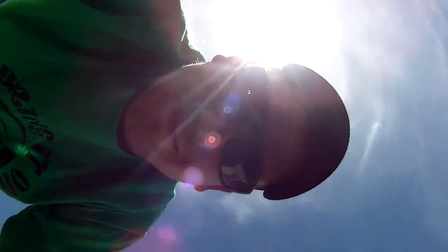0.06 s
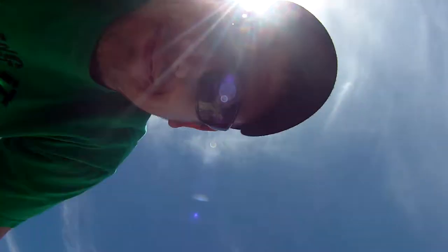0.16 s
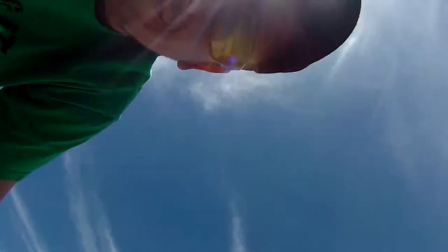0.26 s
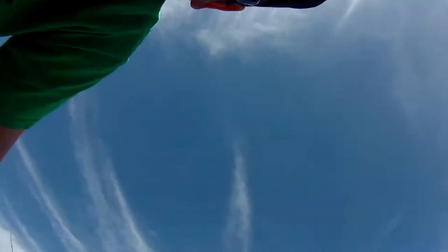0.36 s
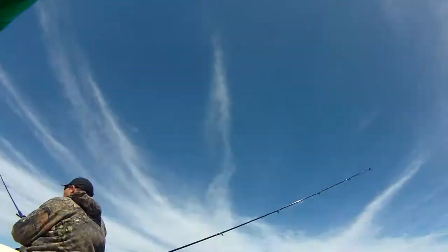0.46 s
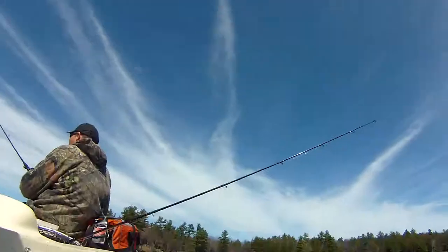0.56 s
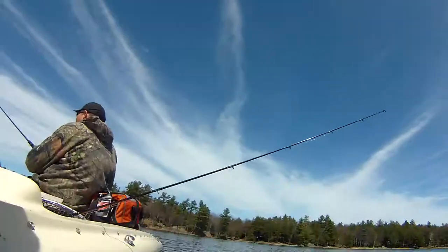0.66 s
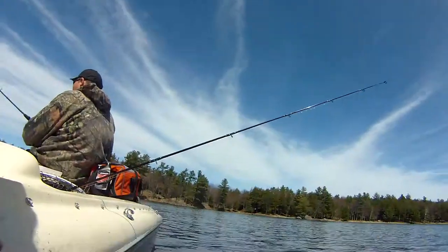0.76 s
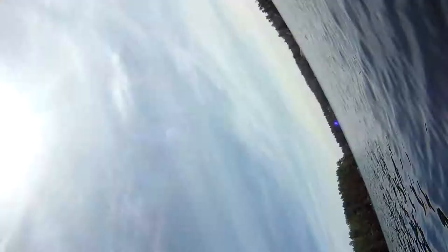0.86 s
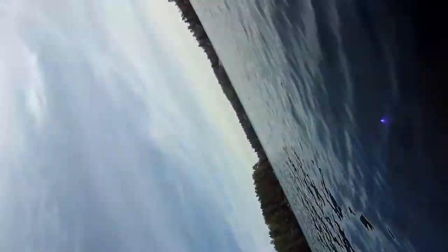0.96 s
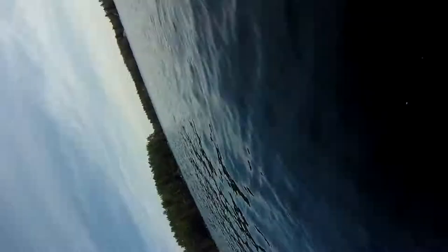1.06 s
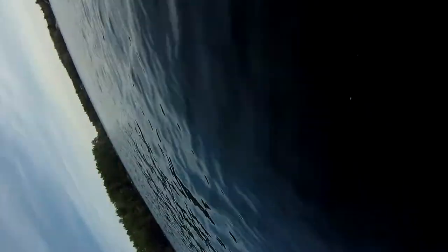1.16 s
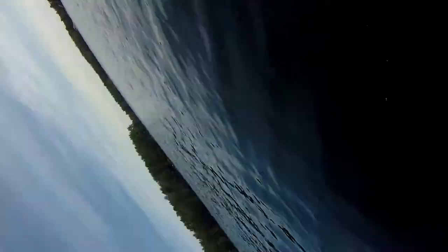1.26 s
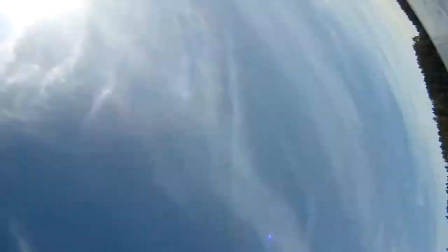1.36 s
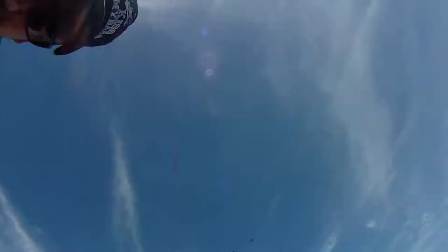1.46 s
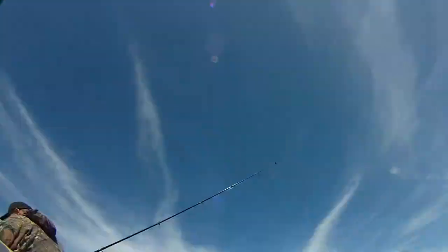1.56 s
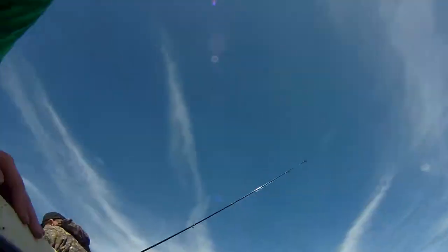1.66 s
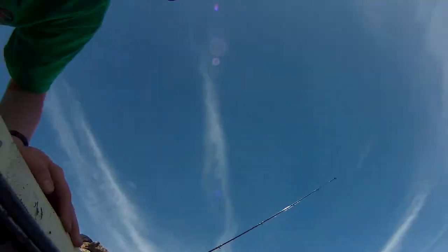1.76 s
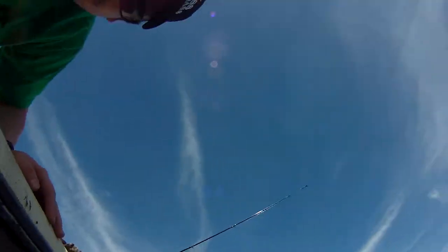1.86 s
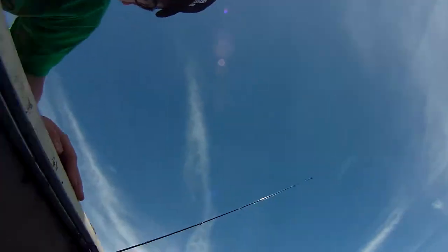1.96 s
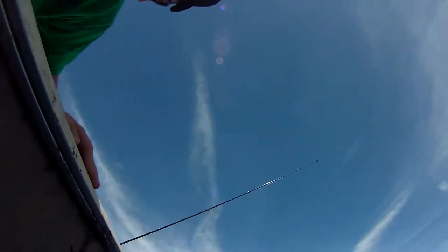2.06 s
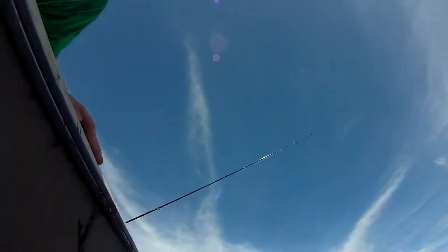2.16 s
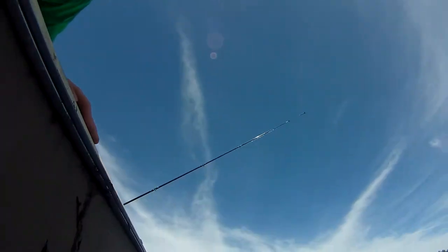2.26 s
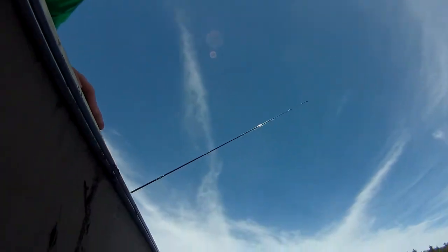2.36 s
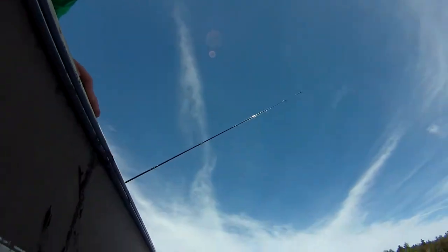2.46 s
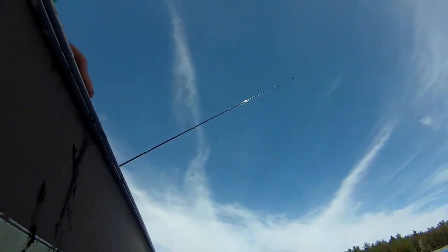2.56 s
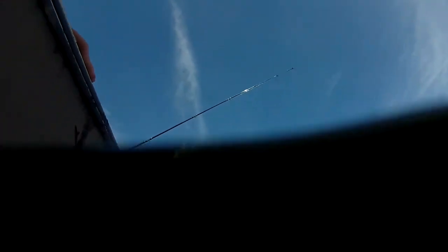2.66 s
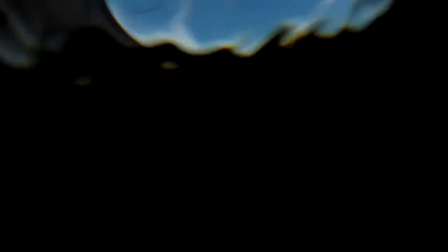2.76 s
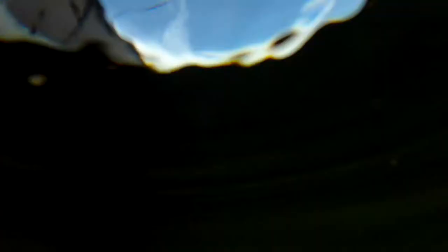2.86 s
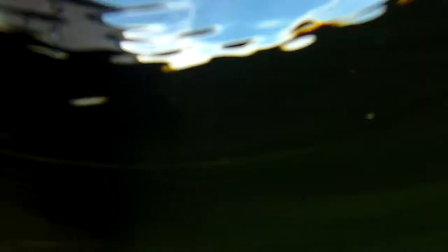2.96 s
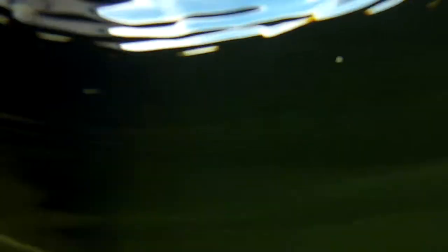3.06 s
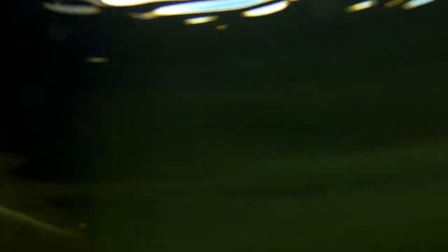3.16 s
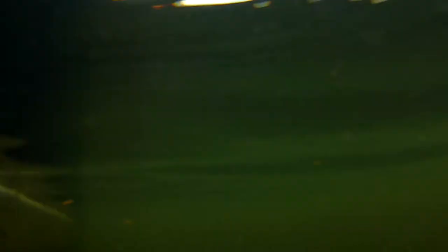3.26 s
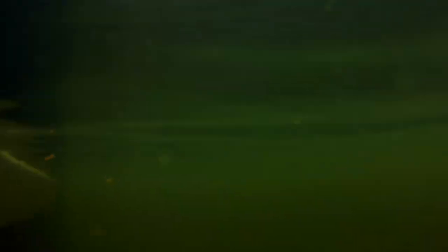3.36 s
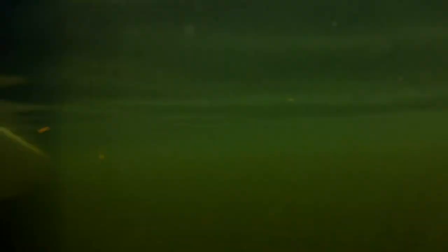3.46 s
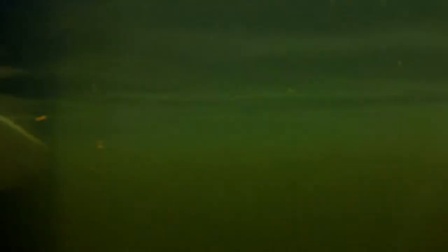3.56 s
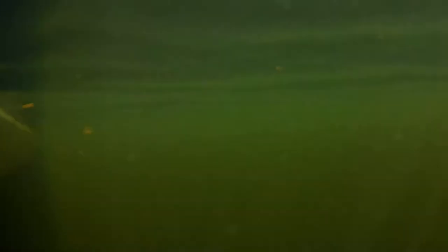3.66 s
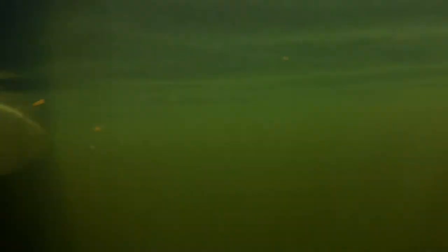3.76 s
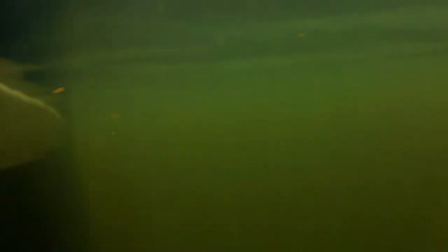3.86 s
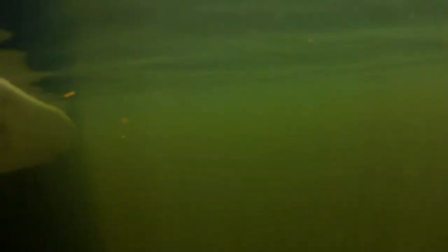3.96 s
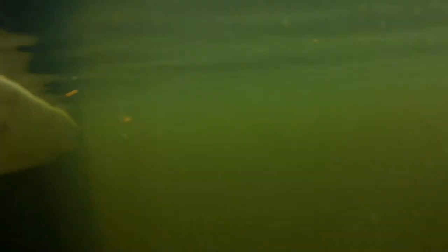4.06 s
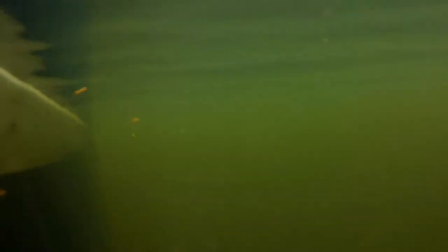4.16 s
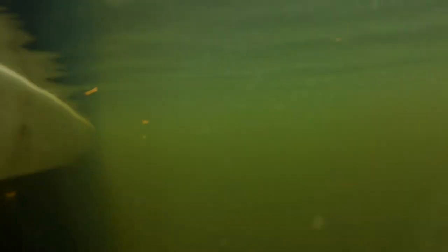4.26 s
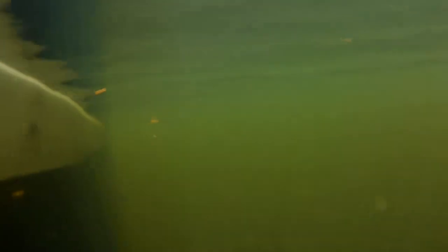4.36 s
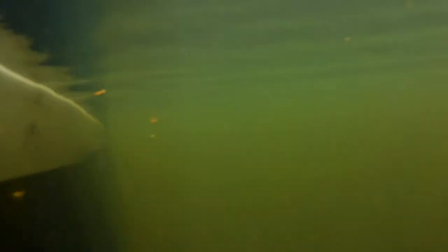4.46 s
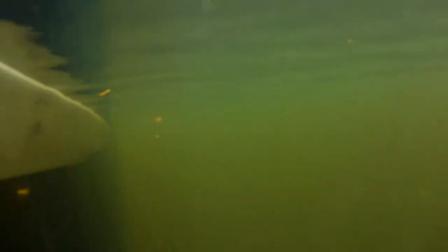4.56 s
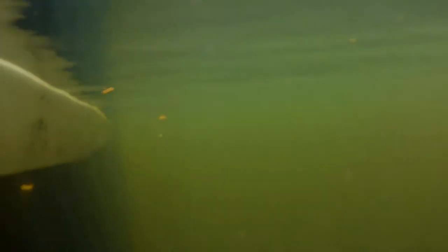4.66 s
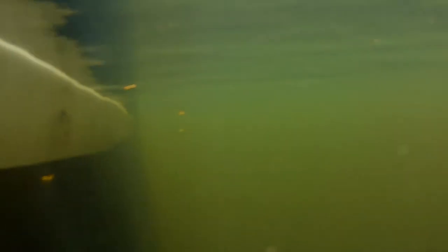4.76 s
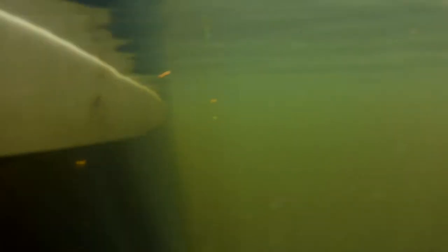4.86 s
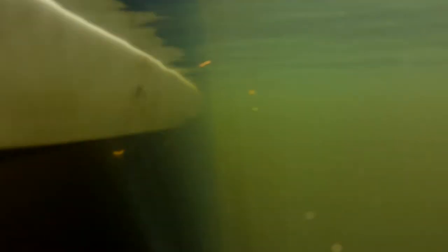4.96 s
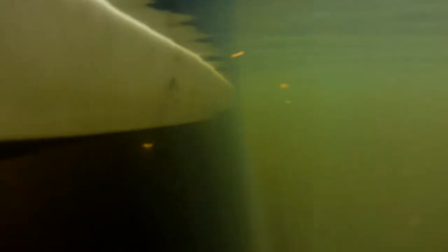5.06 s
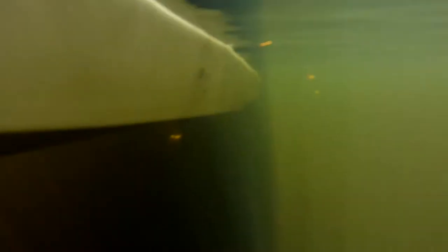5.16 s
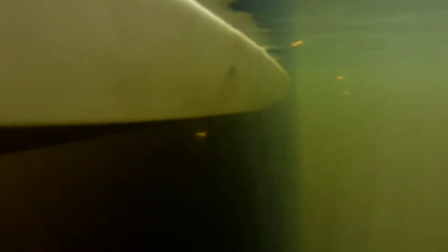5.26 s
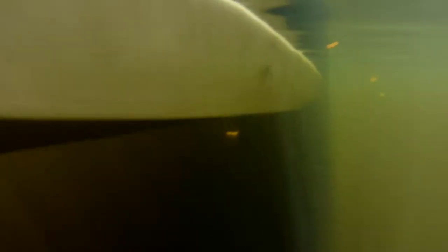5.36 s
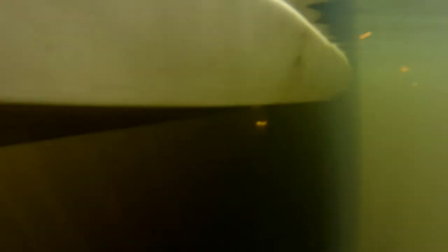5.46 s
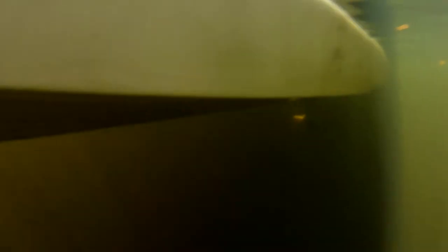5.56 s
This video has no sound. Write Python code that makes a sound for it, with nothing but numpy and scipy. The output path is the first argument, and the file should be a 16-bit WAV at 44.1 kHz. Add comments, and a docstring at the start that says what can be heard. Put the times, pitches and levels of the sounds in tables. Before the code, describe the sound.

A small sealed camera is handled beside a boat, then dunked: dry scrapes give way to heavy bumps, deep watery rumbling and clicks.

```python
"""A small sealed camera is carried to the side of a boat and dipped under water, heard from inside its case.
In air, filtered noise and a wavering sine make wash and hum; bursts of juddering noise are fingers on the case.
Knocks are pressure pulses with clicks, and plops are gliding sines with splashes. At 2.7 s the case goes under:
crackles cluster there, then evened low noise rumbles past and shaped noise swishes by. The recorder ducks at
hard knocks, and holds each slow sample, which mirrors the sound into the treble."""
import sys
import numpy as np
from scipy import signal
from scipy.fft import rfft, irfft
from scipy.io import wavfile
from scipy.ndimage import uniform_filter1d, minimum_filter1d

SR = 44100
rng = np.random.default_rng(int(sys.argv[2]) if len(sys.argv) > 2 else 0)


def digitize_waveform(pressure):
    """Quantize a signal to 16-bit integers and store it at the path in sys.argv[1].

    Rows of a 2-D input are taken as channels; values are limited to [-1, 1].
    """
    field = np.atleast_2d(pressure).T
    bounded = np.clip(field, -1, 1)
    quanta = np.round(bounded * 32767).astype(np.int16)
    wavfile.write(sys.argv[1], SR, quanta)


N = 247842
TIME = np.arange(N) / SR  # s
UNDER_S = 2.73  # the moment the case goes under

# muffled open-air wash: (frequency [Hz], relative level [dB per Hz])
AIR_SPECTRUM = [(20, -7), (45, -7.5), (90, -9), (132, -5.5), (190, -11.5), (350, -16), (600, -22.5),
                (900, -23), (1500, -29), (2200, -30), (2900, -36.5), (5800, -55.5)]
AIR_START_DB, AIR_RISE_DB_PER_S = -46, 1.0  # grows as the camera nears the water
# low hum, perhaps a motor on the boat, ahead of a 4.5 dB lift: (time [s], level [dB])
HUM_LEVEL = [(0.0, -50), (0.57, -54), (0.99, -46), (1.13, -51), (1.32, -42.5), (1.64, -49), (2.6, -44)]
HUM_HZ = 69.2

# fingers slide on the dry case, ahead of a 0.85 dB lift:
# (start [s], end [s], mid-stroke level [dB], swell from start to end [dB])
RUB_STROKES = [(0.209, 0.273, -42, 8), (0.28, 0.449, -36.5, -16), (0.459, 0.52, -41.5, 12),
               (0.626, 0.697, -35, -4), (0.683, 0.817, -53, -3), (0.809, 0.855, -40.5, 11),
               (0.913, 1.106, -55, 9), (1.069, 1.294, -39, 7), (1.37, 1.417, -41.5, -10),
               (1.42, 1.5, -47, 8), (1.492, 1.605, -35, -8.5), (1.632, 1.768, -39.5, 10.5),
               (1.788, 1.951, -39.5, 17), (1.989, 2.125, -41.5, -4), (2.226, 2.267, -52.5, 0),
               (2.389, 2.424, -44, -5), (2.56, 2.71, -56, 23)]
# tone of skin on the case: (frequency [Hz], relative level [dB])
RUB_SPECTRUM = [(300, -5), (900, -13), (1400, -7.5), (2100, -4.5), (2900, -9.5), (3800, -5.5), (4400, 0),
                (4950, 5.5), (5400, 5.5), (5900, -4.5)]
RUB_ATTACK_S, RUB_RELEASE_S, RESTING_DB = 0.02, 0.032, -64  # fingers at rest barely hiss
RUB_ARCH_DB, RUB_WAVER_DB = 3, 2  # pressure is greatest in mid-stroke, and never quite steady
# a finger catches on the dry case, ahead of a 3 dB lift: (time [s], level [dB])
FINGER_CATCHES = [(0.057, -25.5), (0.2835, -16.5), (0.642, -13), (2.476, -20.5), (2.644, -23), (2.687, -19),
                  (2.706, -21)]

# water and hand knock the case; the click is set ahead of an 8 dB cut:
# (time [s], push [dB], rise [s], hold [s], suction beforehand [share of push], click [dB])
CASE_KNOCKS = [ (0.065, -25.5, 0.0039, 0.013, 0.075, -70), (1.749, -23, 0.0032, 0.0098, 0.46, -70),
               (2.6627, -1.5, 0.0014, 0.0004, 0, -17.5), (2.7334, 6.5, 0.00011, 0.00091, 0.67, -19),
               (2.7864, -9.5, 0.00078, 0.0026, 0.76, -17), (2.798, -1.5, 0.0011, 0.0046, 0, -19),
               (2.8747, -9, 0.00059, .0033, 0.23, -31), (2.8937, -2.5, 0.00083, 0.0037, 0, -42),
               (2.9146, -14.5, 0.00052, 0.0054, 0.42, -23), (2.987, -12.5, 0.00081, 0.0098, 0.35, -53),
               (3.1512, 6, .0012, .0037, 0.22, 1.5), (3.329, 9.5, 0.00049, 0.0052, 0.05, 10),
               (3.555, 7, 0.00045, 0.00506, 0.056, 5.5), (3.998, -5.5, 0.00083, 0.0036, 0.48, -5.5),
               (4.422, 12, 0.0004, 0.0039, 0.045, 14.5), (4.974, -8.5, 0.0019, 0.0068, 1, -34),
               (5.054, -5, 0.00065, .0044, 0, -8.5), (5.291, -3.5, 0.0036, 0.0036, 0, -50)]
# modes of the case, ahead of their swell: (multiple of the click pitch, relative level [dB], t60 [s])
CASE_MODES = [(.78, 13.5, 0.00076), (1, 7, 0.0016), (1.25, -69, 0.0017)]
# a slower knock draws the water back earlier; the width is a share of that lead
SUCTION_S, SUCTION_PER_RISE, SUCTION_WIDTH = 0.00057, 4.96, 0.8
CLICK_SURFACE_HZ, CLICK_DEEP_HZ, SINK_S = 1120, 1933, 0.16  # the click rises in pitch as the case sinks

# air pockets ring as water laps the hull:
# (time [s], level [dB], pitch [Hz], t60 [s], splash re the ring's reference level [dB])
HULL_PLOPS = [ (0.775, -27.5, 1464, 0.02, -4.5), (0.777, -32, 1890, 0.028, -10),
              (1.037, -34.5, 750, 0.033, -5), (1.040, -35, 122, 0.14, -2), (1.042, -29, 338, 0.093, 0.5),
              (1.655, -40, 607, 0.058, 3.5), (2.101, -27, 930, 0.041, -4), (2.409, -45, 1024, 0.11, 3.5),
              (2.565, -21.5, 703, 0.035, -12), (2.7318, -9.5, 315, 0.02, -1.5),
              (2.783, -18.5, 1110, 0.015, -8), (2.798, -24.5, 1224, 0.025, -15),
              (2.825, -32.5, 656, 0.024, 1), (2.986, -29.5, 2100, 0.015, -20),
              (3.011, -25.5, 142, 0.088, -17), (3.7938, -18, 472, 0.032, -5), (4.202, -28, 323, 0.075, 3.5),
              (4.371, -29.5, 263, .056, -7), (4.396, -28, 698, 0.028, 4), (4.398, -20.5, 1325, 0.026, -3),
              (4.717, -34, 432, 0.11, 0.5), (4.858, -12, 498, 0.059, -8.5), (5.430, -37.5, 629, 0.066, -12),
              (5.435, -34.5, 1295, 0.042, 0.5), (5.4346, -29, 1880, 0.02, -3)]
# modes of an air pocket: (multiple of the pitch, level [dB])
POCKET_MODES = [(1.002, 2.5), (1.158, -5.5), (1.85, -12), (2.4, -16)]
POCKET_DAMPING = 0.59  # ring time falls with the mode's multiple to this power
# tone of a plop's splash: (multiple of the pitch, relative level [dB])
SPLASH_SPECTRUM = [(.2, 9), (.6, -1), (.9, 2), (1.3, 3.5), (2.2, -39), (4, -32), (10, -37.5)]

# short crackles of water and trapped air on the case, ahead of a 3 dB lift: (time [s], level [dB])
CASE_CRACKLES = [(2.566, -21), (2.706, -19.5), (2.717, -24.5), (2.725, -22), (2.741, -35), (2.7685, -26),
                 (2.7815, -19), (2.7975, -16), (2.8725, -25.5), (2.896, -29.5), (2.916, -24), (2.956, -31),
                 (3.5075, -21), (3.824, -24.5), (4.154, -30), (4.236, -28), (4.315, -31), (4.966, -28.5),
                 (4.981, -29.5), (5.098, -35), (5.227, -36.5), (5.2895, -27)]
# tone of crackles, chatter and ticks: (frequency [Hz], relative level [dB per Hz])
CRACKLE_SPECTRUM = [(150, 19), (450, -10), (700, 12), (1100, 3.5), (1700, 3.5), (2200, -1.5), (2800, -4),
                    (4000, -4), (5800, -14.5)]

# strength of the current: the plunge, a lull, then the sweep along the hull: (time [s], level [dB])
CURRENT_LEVEL = [(2.66, -23), (2.82, -17.5), (3.0, -21.5), (3.07, -25), (3.22, -28.5), (3.3, -25),
                 (3.42, -29.5), (3.66, -27), (3.79, -15), (4.07, -19), (4.4, -17), (4.65, -24.5),
                 (4.95, -20), (5.1, -24), (5.26, -16), (5.45, -21.5), (5.62, -24)]
# rumble of the eddies: (frequency [Hz], relative level [dB])
EDDY_SPECTRUM = [(10, -12), (20, 1), (30, 6), (43, -0.5), (60, -9.5), (85, -18), (130, -27.5), (220, -38.5),
                 (500, -52), (1200, -68), (3000, -103), (5600, -79)]
EDDY_SWELL_DB = 0  # slow unevenness of the eddies; 0 is steady
# fizz of the open water: (frequency [Hz], relative level [dB])
FIZZ_SPECTRUM = [(60, 1), (200, -1.5), (450, -4.5), (900, -10.5), (1600, -16.5), (2800, -20.5), (4200, -24),
                 (5800, -31.5)]
FIZZ_DB, FIZZ_FOLLOWS = -49, 0.28  # level at a 0 dB current; share of the current's dB swing it follows
SURFACE_FIZZ_DB, SURFACE_FIZZ_S = 2, 1  # extra fizz just under the surface; its fading time constant
TICKS_PER_S, TICKS_DB = 91, -59  # specks of air touching the case

# water swishes past the grip and the case: (peak [s], rise [s], fall [s], level [dB], upper edge [Hz])
WATER_SWISHES = [(3.14, 0.14, 0.026, -56.5, 3620), (3.301, 0.084, 0.04, -42.5, 3130),
                 (3.54, .11, 0.034, -35, 3190), (3.819, 0.075, 0.052, -40, 3300),
                 (3.95, 0.041, 0.072, -48, 3350), (4.05, 0.13, 0.063, -46.5, 2120),
                 (4.225, 0.078, 0.051, -42, 2230), (5.294, 0.016, 0.057, -49, 4340),
                 (5.314, 0.056, 0.07, -45.5, 2150)]
# tone of a swish ahead of its upper edge: (frequency [Hz], relative level [dB per Hz])
SWISH_SPECTRUM = [(150, 9), (480, -5), (700, -2), (1000, 8), (1250, 0.5), (1700, 7.5), (2200, 3), (2900, 4),
                  (4000, 5.5), (5800, 22.5)]

HELD_HZ, EDGE_HZ = 12000, 15600  # the recorder's slow sampling rate and its band limit


def gain_of(db):
    """Decibels to amplitude."""
    return 10 ** (np.asarray(db) / 20)


def evened(x):
    """Scales to rms 1."""
    return x / np.sqrt(np.mean(x ** 2) + 1e-20)


def level(curve):
    """Gain at every sample from rows (time [s], level [dB])."""
    return gain_of(np.interp(TIME, *np.transpose(curve)))


def colour(x, spectrum, unit=1):
    """Filters by points joined on a log frequency axis, without DC; the result has rms 1."""
    hz, db = np.transpose(spectrum)
    bins = np.fft.rfftfreq(len(x), 1 / SR)
    response_db = np.interp(np.log(bins + 1), np.log(hz * unit), db)
    return evened(irfft(rfft(x) * gain_of(response_db) * (bins > 0), len(x)))


def noise(spectrum, size=N, unit=1):
    """Coloured noise of rms 1."""
    return colour(rng.standard_normal(size), spectrum, unit)


def wander(rate_hz):
    """Smooth chance of rms 1, no faster than the rate."""
    slow_bins = np.fft.rfftfreq(N, 1 / SR) < rate_hz
    return evened(irfft(rfft(rng.standard_normal(N)) * slow_bins, N))


def dying(t, t60, rise):
    """Quick swell, then exponential decay."""
    return (1 - np.exp(-t / rise)) * np.exp(-np.log(1000) * t / t60)


def add(mix, s, sound):
    """Mixes a sound in at s seconds."""
    part = mix[max(round(s * SR), 0):][:len(sound)]
    part += sound[:len(part)]


def friction(spectrum, grain_db, judder_db):
    """Tiny slips of uneven size, in clumps, heard through the case."""
    slips = rng.standard_normal(N)
    unevenness_db = grain_db * wander(rate_hz=910) + judder_db * wander(rate_hz=60)
    return colour(slips * gain_of(unevenness_db), spectrum)


def bursts(rows, spectrum, rise, t60):
    """Short dying scrapes of one colour."""
    t, out = np.arange(4096) / SR, np.zeros(N)
    for s, db in rows:
        add(out, s, gain_of(db + 3) * dying(t, t60, rise) * noise(spectrum, size=len(t)))
    return out


def open_air():
    """Airborne wash and hum, both shut out once the water closes over the case."""
    hum_hz = HUM_HZ * (1 + 0.006 * wander(rate_hz=3))
    hum = np.sqrt(2) * np.sin(2 * np.pi * np.cumsum(hum_hz) / SR)
    wash = gain_of(AIR_START_DB + AIR_RISE_DB_PER_S * TIME) * noise(AIR_SPECTRUM)
    above = np.clip((UNDER_S - TIME) / 0.019, 0, 1)
    return above * (wash + gain_of(4.5) * level(HUM_LEVEL) * hum)


def grip():
    """Slipping fingers hiss on the dry case, stroke by stroke, until it is wet."""
    power = gain_of(RESTING_DB) ** 2
    for start, end, db, swell_db in RUB_STROKES:
        attack = np.clip((TIME - start) / RUB_ATTACK_S, 0, 1)
        release = np.clip(1 - (TIME - end) / RUB_RELEASE_S, 0, 1) ** 2
        progress = np.clip((TIME - start) / (end - start), 0, 1)
        arch_db = -RUB_ARCH_DB * (2 * progress - 1) ** 2
        stroke = attack * release * gain_of(db + swell_db * (progress - 0.5) + arch_db)
        power = power + stroke ** 2
    dry_case = np.clip((UNDER_S - TIME) / 0.033, 0, 1)
    waver = gain_of(0.85 + RUB_WAVER_DB * wander(rate_hz=6.6))
    return dry_case * np.sqrt(power) * waver * friction(RUB_SPECTRUM, grain_db=1.5, judder_db=1.48)


def catches():
    """A finger sticks for an instant, giving a short scrape in the tone of the rubbing."""
    return bursts(FINGER_CATCHES, RUB_SPECTRUM, rise=0.003, t60=0.015)


def case_click(after, s):
    """The shell rings; each mode swells before it dies, which keeps the click dull."""
    depth_left = np.exp(-max(s - UNDER_S, 0) / SINK_S)
    click_hz = CLICK_DEEP_HZ + (CLICK_SURFACE_HZ - CLICK_DEEP_HZ) * depth_left
    ring = np.zeros(len(after))
    for ratio, db, t60 in CASE_MODES:
        envelope = gain_of(db - 60 * after / t60) * after ** 2
        ring += envelope * np.sin(2 * np.pi * click_hz * ratio * after)
    return ring / abs(ring).max()


def knocks(release=0.0012, leak_hz=28, rattle_db=-25):
    """Each knock squeezes the case; pressure leaks and undershoots, the shell clicks, trapped air crackles."""
    lead = 0.025  # s of room for the suction ahead of the knock
    t = np.arange(4096) / SR - lead
    after = np.maximum(t, 0)
    pushes, clicks = np.zeros(N), np.zeros(N)
    for s, push_db, rise, hold, suction, click_db in CASE_KNOCKS:
        squeeze = (1 + np.tanh(t / rise)) / 2 * (1 - np.tanh((t - hold) / release)) / 2
        suction_lead = SUCTION_S + SUCTION_PER_RISE * rise
        draw = suction * np.exp(-((t / suction_lead + 1) / SUCTION_WIDTH) ** 2)
        add(pushes, s - lead, gain_of(push_db) * (squeeze - draw))
        click = gain_of(click_db - 8) * case_click(after, s)
        chatter = noise(CRACKLE_SPECTRUM, size=len(t)) * dying(after, t60=0.031, rise=0.0001)
        add(clicks, s - lead, click + gain_of(push_db + rattle_db) * chatter)
    leak = signal.butter(1, leak_hz, "highpass", fs=SR)
    return signal.lfilter(*leak, pushes) + clicks


def plops(glide_per_s=0.6, rise=0.0014):
    """An air pocket rings, rising slightly in pitch, inside a brief splash; higher modes die sooner."""
    t, out = np.arange(8192) / SR, np.zeros(N)
    for s, db, hz, t60, splash_db in HULL_PLOPS:
        turns = hz * t * (1 + glide_per_s * t / 2)
        ring = np.zeros(len(t))
        for ratio, mode_db in POCKET_MODES:
            envelope = gain_of(mode_db) * dying(t, t60 / ratio ** POCKET_DAMPING, rise)
            ring += envelope * np.sin(2 * np.pi * ratio * turns)
        splash_noise = noise(SPLASH_SPECTRUM, size=len(t), unit=hz)
        splash = gain_of(splash_db) * dying(t, t60, rise) * splash_noise
        add(out, s, gain_of(db) * (ring + splash))
    return out


def crackles():
    """Water and trapped air snap on the case in short dying bursts of noise."""
    return bursts(CASE_CRACKLES, CRACKLE_SPECTRUM, rise=0.00026, t60=0.012)


def flow():
    """Eddies sway the pressure on the case; the water fizzes faintly and specks of air tick against it."""
    current, eddies = level(CURRENT_LEVEL), noise(EDDY_SPECTRUM)
    eddies /= np.sqrt(uniform_filter1d(eddies ** 2, size=4000) + 1e-6)  # eddies of like size follow on
    froth_db = SURFACE_FIZZ_DB * np.exp(-np.maximum(TIME - UNDER_S, 0) / SURFACE_FIZZ_S)
    fizz = gain_of(FIZZ_DB + froth_db) * current ** FIZZ_FOLLOWS * noise(FIZZ_SPECTRUM)
    fizz *= gain_of(1.8 * wander(rate_hz=45))
    touches = rng.random(N) < TICKS_PER_S / SR
    specks = touches * gain_of(5 * np.minimum(rng.exponential(1, N), 2))
    # ticks are harder in a stronger current
    ticks = gain_of(TICKS_DB) * evened(np.sqrt(current) * colour(specks, CRACKLE_SPECTRUM))
    rumble = current * eddies * gain_of(EDDY_SWELL_DB * wander(rate_hz=3))
    under = np.clip((TIME - UNDER_S) / 0.13 + 1, 0, 1)
    return under * (rumble + fizz + ticks)


def swishes():
    """Each surge of water swells and fades as rough noise, with its own upper edge."""
    rush, out = friction(SWISH_SPECTRUM, grain_db=2.5, judder_db=3.0), np.zeros(N)
    for peak, rise, fall, db, edge_hz in WATER_SWISHES:
        ramp = np.interp(TIME, [peak - rise, peak, peak + fall], [0, 1, 0])
        swell = np.sin(np.pi / 2 * ramp) ** 2
        edge = signal.butter(8, edge_hz, fs=SR, output="sos")
        out += gain_of(db) * swell * evened(signal.sosfilt(edge, rush))
    return out


def limiter(x, ceiling_db=1.0, recover_db_per_s=125):
    """Hard knocks push the gain down at once; the water comes back as it recovers."""
    peak_db = 20 * np.log10(-minimum_filter1d(-abs(x.mean(0)), size=260) + 1e-9)
    recovery = recover_db_per_s * TIME
    held_peak_db = np.maximum.accumulate(peak_db + recovery) - recovery
    over_db = np.maximum(held_peak_db - ceiling_db, 0)
    return x * gain_of(-uniform_filter1d(over_db, size=130))


def scene():
    """Everything is heard from inside the case, alike in both channels."""
    snaps = crackles() + catches()
    mono = snaps + open_air() + grip() + flow() + swishes() + knocks() + plops()
    return np.array([mono, mono])


def record(dry):
    """Limits, samples slowly, overloads and holds each value, so images mirror round the slow rate."""
    slow = signal.resample_poly(limiter(dry), HELD_HZ, SR, axis=1, window=("kaiser", 5))
    steps = np.repeat(np.clip(slow, -1, 1), 4, axis=1)
    held = signal.resample_poly(steps, SR, 4 * HELD_HZ, axis=1)[:, :N]
    band_limit = signal.firwin(201, EDGE_HZ, window=("kaiser", 8), fs=SR)
    return signal.oaconvolve(held, band_limit[None], "same")


dry = scene()
out = record(dry)
digitize_waveform(out)
```